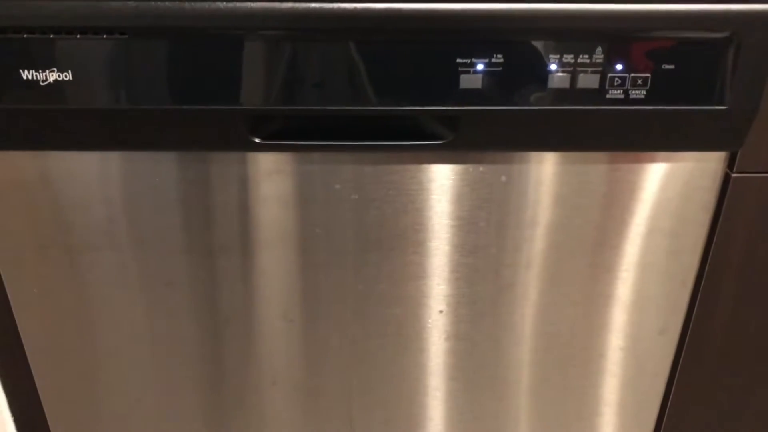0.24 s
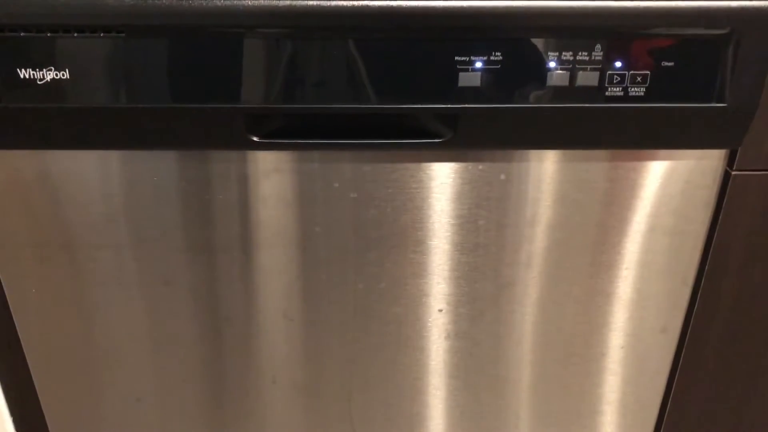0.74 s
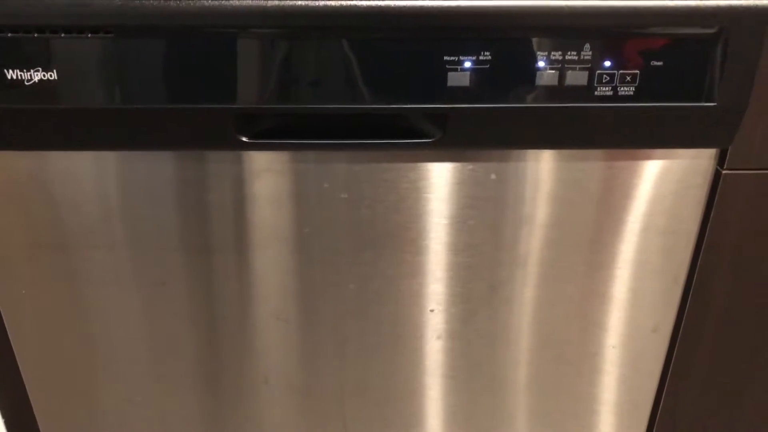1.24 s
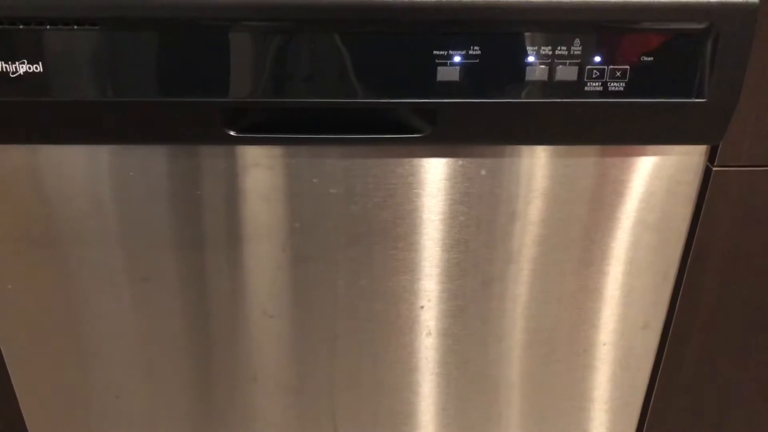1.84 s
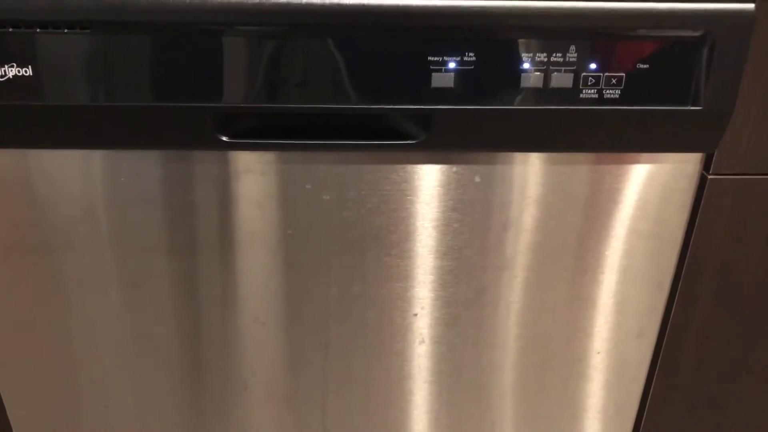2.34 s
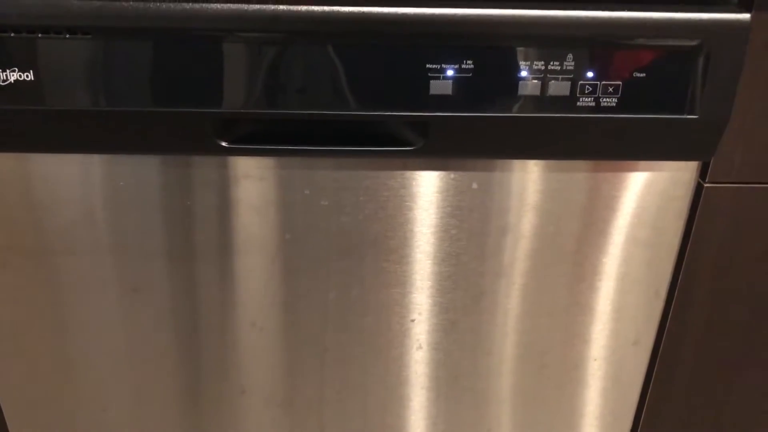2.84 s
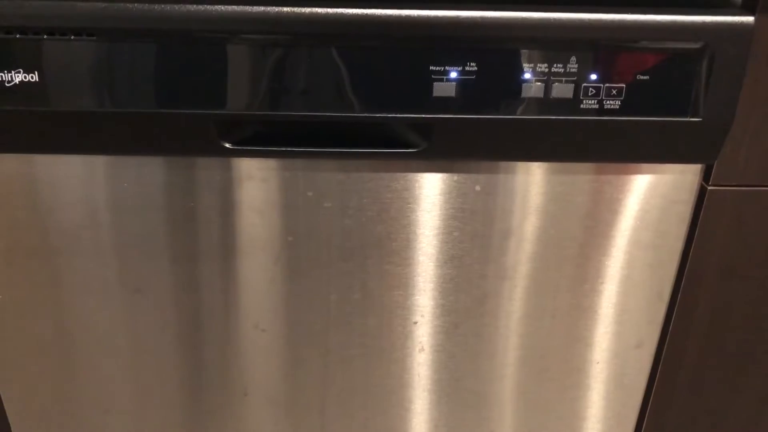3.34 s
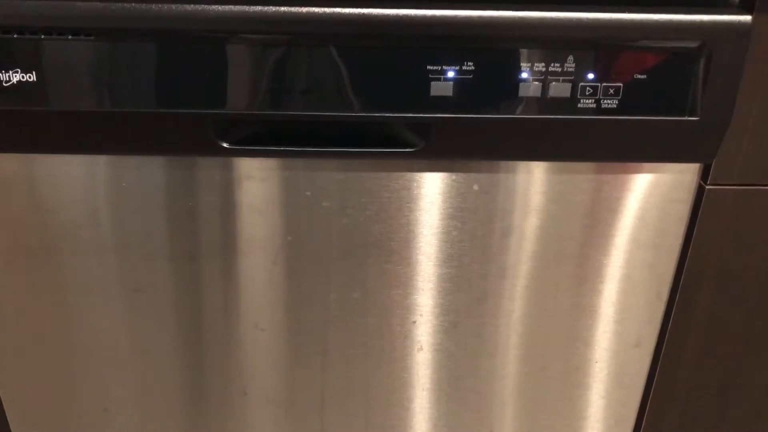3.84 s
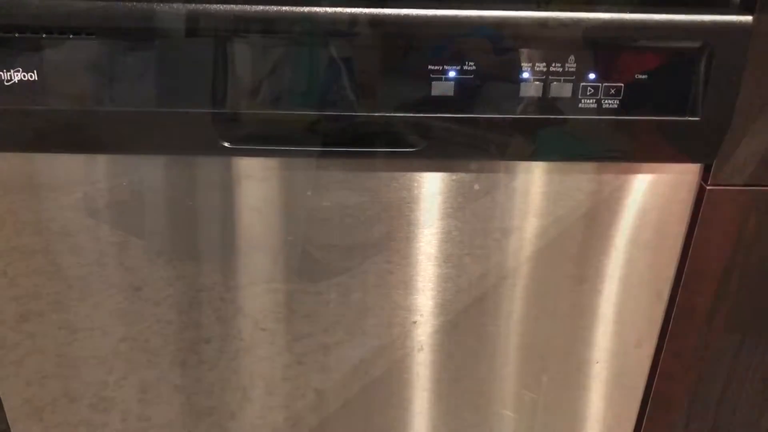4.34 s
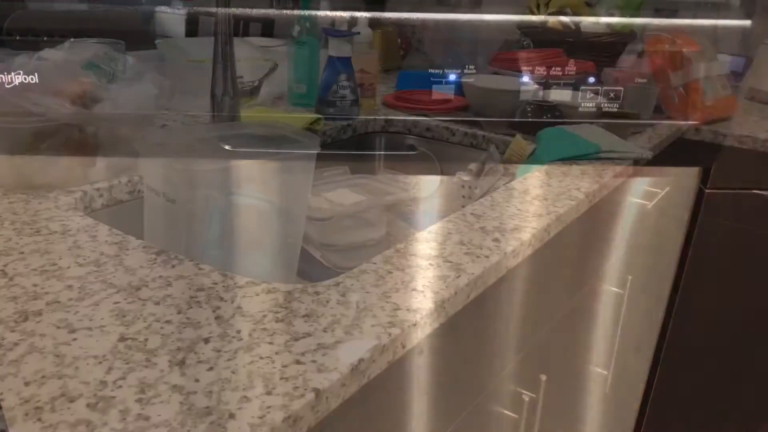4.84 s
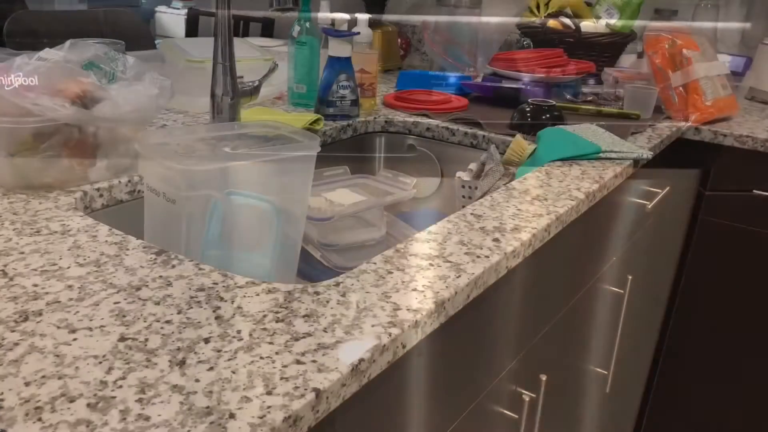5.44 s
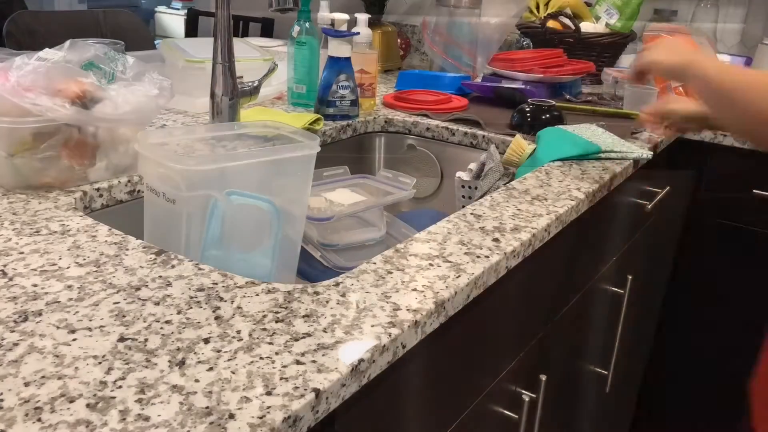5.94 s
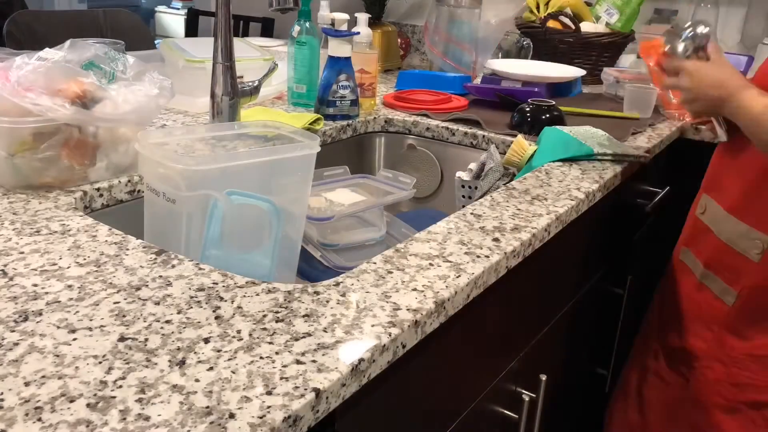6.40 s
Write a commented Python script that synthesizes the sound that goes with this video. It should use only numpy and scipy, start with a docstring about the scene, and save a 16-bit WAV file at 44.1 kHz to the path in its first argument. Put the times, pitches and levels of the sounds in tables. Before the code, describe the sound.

A dishwasher heard up close through its closed door in a home kitchen. A steady low electric hum sits under muffled water drumming on the metal tub, soft splashing and faint hiss. Irregular thuds, light clicks and gurgles pass throughout; dishes clink near the start and again before three seconds. From just past four seconds everything fades evenly to silence.

```python
"""A dishwasher in mid-wash, heard from just in front of its steel door in a kitchen.
From the start: the pump motor hums at twice the mains rate, spray drums on the tub, water splashes and churns.
Slugs, clicks and gurgles follow throughout; dishes clink at 0.2 s and about 2.6 s.
The panel drumming eases once a turn of the spray arm, around 1.7, 3.6 and 5.5 s.
From 4.2 s everything fades, to silence at 6.2 s. Water is filtered random impacts and bubbles; the hum is sines."""
import sys
import numpy as np
from scipy import signal
from scipy.fft import rfft, irfft
from scipy.io import wavfile
from scipy.ndimage import uniform_filter1d

SR = 44100
rng = np.random.default_rng(int(sys.argv[2]) if len(sys.argv) > 2 else 0)


def master(y):
    """Save y as 16-bit WAV."""
    cut = np.clip(np.atleast_2d(y).T, -1, 1)
    pcm = np.round(cut * 32767)  # scale
    wavfile.write(sys.argv[1], SR, pcm.astype(np.int16))


N = 294110
TIME_S = np.arange(N) / SR

# motor lines: (multiple of the hum rate [1], rms level [dB])
HUM_LINES = [(1, -40.5), (2, -69.5), (3, -65), (5, -68), (8, -79.5), (9, -84.5), (11, -81), (12, -86),
             (13, -79), (18, -83.5)]
# door and big tub panels: (frequency [Hz], width [Hz], gain [dB])
PANEL_MODES = [(145, 18, -3), (169, 28, -2), (209.2, 15, 5.5), (229.6, 78, -0.5), (271.5, 8.9, -5.5),
               (286.3, 4.2, -3.5), (321.4, 40, -10.5)]
# stiffer walls and racks: (frequency [Hz], width [Hz], gain [dB])
WALL_MODES = [(400, 24, -7), (435.4, 24, 2), (485, 22, 1.5), (515.7, 24, 3), (571.5, 22, -4.5),
              (620, 25, -9), (702, 31, -11), (764, 53, -11)]
# water churning in the sump: (frequency [Hz], relative density [dB per Hz])
SUMP_SPECTRUM = [(25, -27), (40, -12.5), (50, -5), (58, 7), (82, 9), (105, -2.5), (135, -2), (170, 2.5),
                 (300, -36.5)]
# splash heard through the door: (frequency [Hz], relative density [dB per Hz])
SPLASH_SPECTRUM = [(500, -6), (880, -4), (1050, -1.3), (1450, -2.2), (1660, -5.7), (2150, -6), (2600, -9),
                   (4000, -9), (4700, -12), (6200, -13.3), (8200, -18.3), (10000, -18), (12300, -21.5),
                   (15000, -20)]
# thin, steady bands of hiss: (frequency [Hz], width [Hz], gain [dB])
SIZZLE_BANDS = [(5390, 220, -8.5), (6860, 280, -9.5), (8760, 160, -14), (9700, 180, -4), (10180, 140, 0.5),
                (11060, 400, -7), (13800, 1200, -12)]
# slugs of water hitting the panels: (time [s], thud peak [dB], pitch [Hz], splat re thud [dB])
SLUG_HITS = [(0.072, -42, 175, -11), (.098, -39, 227, -13), (.187, -39.5, 400, -16),
             (.565, -36.5, 224, -11), (0.763, -43, 407, -15), (.800, -33.5, 200, -16),
             (0.82, -36, 215, -23.5), (.866, -34.5, 213, -18.5), (.998, -33, 276, -18),
             (.999, -39, 475, -23), (1.048, -39, 286, -14.5), (1.135, -41, 202, -15),
             (1.152, -38, 213, -18), (1.171, -38, 180, -18), (1.2, -39, 205, -22.5), (1.25, -36, 218, -22),
             (1.485, -40.5, 223, -18), (1.886, -39.5, 212, -18.5), (1.925, -39, 240, -24),
             (1.958, -45, 440, -21), (2.094, -40.5, 507, -27), (2.135, -44.5, 494, -20),
             (2.192, -37, 403, -22.5), (2.275, -40, 245, -12.5), (2.496, -38.5, 164, -19.5),
             (2.55, -45, 202, -13), (2.598, -41.5, 418, -7), (2.777, -39, 240, -15), (2.794, -39, 217, -27),
             (2.836, -41, 240, -7), (2.916, -42, 225, -23), (2.958, -39, 209, -11),
             (3.334, -45, 232, -23.5), (3.459, -45, 217, -25), (3.759, -38.5, 230, -12),
             (3.761, -46.5, 553, -6), (3.925, -53, 233, -20), (3.99, -44, 350, -18),
             (4.118, -41, 268, -17.5), (4.173, -36.5, 310, -27), (4.243, -51, 235, -18),
             (4.4, -34.5, 215, -16), (4.455, -45, 220, -18), (4.565, -39, 205, -24),
             (4.593, -38.5, 210, -42), (4.747, -36, 204, -10), (4.779, -38.5, 210, -17),
             (4.803, -36, 209, -12), (4.846, -37, 205, -24), (4.896, -34, 200, -21),
             (4.922, -43.5, 225, -30), (5.023, -36.5, 238, -9.5), (5.125, -47, 214, -15)]
# light clicks and taps: (time [s], peak [dB], frequency [Hz], width [Hz])
CLICK_EVENTS = [(.177, -52.5, 9700, 1000), (.177, -53, 4400, 2000), (.2295, -54, 13000, 6000),
                (.358, -53.5, 7000, 2500), (.7542, -49, 3170, 798), (.7931, -41.5, 1100, 600),
                (.7931, -51.5, 4300, 3200), (.9697, -52.5, 14200, 2910), (1.1787, -45, 4060, 2390),
                (1.1805, -50.5, 3230, 350), (1.8108, -53, 3770, 403), (2.0053, -54.5, 4350, 500),
                (2.0916, -51, 1690, 1990), (2.095, -53, 13800, 5000), (2.2189, -48.5, 9400, 2600),
                (2.4214, -50.5, 5500, 746), (2.4583, -52, 6900, 1800), (2.5571, -51, 9000, 1200),
                (2.5894, -49.5, 9800, 7040), (2.598, -57.5, 10000, 7000), (2.6115, -50, 3800, 2000),
                (2.6944, -55.5, 7000, 2990), (3.2775, -56, 7300, 1200), (3.333, -49, 1400, 300),
                (3.3425, -50, 2480, 900), (3.379, -55, 2750, 350), (3.4635, -59, 9200, 800),
                (4.3266, -47, 1120, 900), (5.022, -52, 1750, 700), (5.323, -52, 1550, 600),
                (5.39, -54, 6200, 1300), (5.4904, -48, 4450, 1200), (6.0117, -48, 7200, 1500),
                (6.083, -53, 9500, 2000), (6.109, -47, 7000, 2420)]
# short gurgles and swishes: (time [s], peak [dB], frequency [Hz], width [Hz])
GURGLE_EVENTS = [(.648, -48, 780, 100), (.672, -45.5, 780, 80.4), (1.012, -50.5, 1060, 250),
                 (1.06, -52, 1200, 400), (1.562, -47, 1240, 892), (1.6, -50, 1800, 900),
                 (2.03, -51.5, 3200, 900), (4.228, -48.5, 1890, 1500), (4.79, -49, 1208, 400),
                 (5.055, -52, 1314, 500)]
# dishes knocking together: (time [s], peak [dB], contact centre [Hz], chatter t60 [s])
CLINK_EVENTS = [(.1897, -41, 6200, .06), (2.5574, -48.5, 5400, .04), (2.6115, -39.5, 5600, .028),
                (2.637, -48.5, 6900, 0.018)]
# ringing modes of a dish: (frequency [Hz], width [Hz], gain [dB])
DISH_MODES = [(4280, 160, -10.5), (5000, 230, 4), (5340, 200, -0.5), (6170, 170, 8), (6460, 180, -7),
              (6850, 180, -2), (8200, 210, -14.5)]
# amount of water landing on the tub: (time [s], level [dB])
FLOW_CURVE = [(0.0, -5), (0.15, 1.5), (0.5, -1.1), (0.85, -0.5), (1.1, 2.5), (1.35, -0.5), (1.55, 2),
              (1.78, -0.4), (2.15, 3), (2.38, -2.5), (2.6, -0.2), (2.9, 0.5), (3.15, -1.2), (3.55, -1),
              (3.72, -2), (3.95, -1.8), (4.2, 1.5), (4.45, 1), (4.7, -1), (5.15, 2.5), (5.62, -3.5),
              (5.9, 0.7)]
# swell of the fine splash and droplets: (time [s], level [dB])
SPLASH_SWELL_CURVE = [(0.0, 0.6), (1.15, 0.6), (1.35, -0.6), (1.6, 0.7), (2.2, 0), (2.7, 1), (2.9, -2),
                      (3.25, 0.3), (3.7, -1.2), (4.27, 2), (4.6, -0.5), (5.05, 0.3), (5.5, 0), (5.9, -1)]

HUM_HZ, HUM_START_DB, HUM_SAG_DB_PER_S = 120.02, -0.02, 0.06
# spray arm: one turn, a moment when its jets point away from the panels, 1/e half-width of that lull
ARM_TURN_S, ARM_AWAY_S, LULL_S = 1.9, 1.66, 0.3
# drumming level, and its drop in the lull (negative: a rise)
PANEL_DB, PANEL_LULL_DROP_DB = -50, 4
WALL_DB, WALL_LULL_DROP_DB = -55.4, -1
SPLASH_DB, DROPLET_DB, SUMP_DB, SIZZLE_DB = -59.5, -72, -58, -74.5
SLOSH_DB, SLOSH_LOW_HZ, SLOSH_HIGH_HZ = -69, 836, 2330  # larger bubbles: level, range of starting pitch
SLOSH_FOLLOWS, SUMP_FOLLOWS = 0.4, 0.15  # share of the flow's dB swing
CLICK_T60_S, GURGLE_T60_S = 0.043, 0.17
FADE_START_S, FADE_END_S, CUTOFF_HZ = 4.21, 6.19, 15720


def from_db(db):
    """Decibels to gain."""
    return 10 ** (np.asarray(db) / 20)


def rms_one(x):
    """Scale to unit rms."""
    return x / np.sqrt(np.mean(x ** 2) + 1e-20)


def drift(rate_hz):
    """Slow random curve of unit rms: noise through a double pole, made at SR / 40."""
    pole = np.exp(-80 * np.pi * rate_hz / SR)
    noise = rng.standard_normal(N // 40 + 2002)
    slow = signal.lfilter([1], [1, -2 * pole, pole * pole], noise)[2000:]  # settled part only
    return np.interp(np.arange(N) / 40, np.arange(len(slow)), rms_one(slow))


def in_time(rows):
    """Curve of (time [s], value) at every sample."""
    return np.interp(TIME_S, *np.transpose(rows))


def colour(x, spectrum):
    """Shape a signal by (frequency [Hz], level [dB]) with the bass rolled off; unit rms."""
    hz, db = np.transpose(spectrum)
    bins_hz = np.maximum(np.fft.rfftfreq(N, 1 / SR), 1)
    closed_bass = np.minimum(bins_hz / hz[0], 1) ** 2
    gain = from_db(np.interp(np.log(bins_hz), np.log(hz), db))
    return rms_one(irfft(rfft(x) * gain * closed_bass, N))


def resonate(x, hz, width_hz):
    """One two-pole resonance with peak gain 1."""
    r = np.exp(-np.pi * width_hz / SR)
    zeros = np.array([1, 0, -1]) * (1 - r * r) / 2
    poles = [1, -2 * r * np.cos(2 * np.pi * hz / SR), r * r]
    return signal.lfilter(zeros, poles, x + 1e-18)


def body(x, modes):
    """Drive a set of modes in parallel."""
    return sum(from_db(db) * resonate(x, hz, width_hz) for hz, width_hz, db in modes)


def band(x, low_hz, high_hz):
    """Causal band-pass."""
    return signal.sosfilt(signal.butter(2, [low_hz, high_hz], "band", fs=SR, output="sos"), x)


def even(x, window_s):
    """Hold the running rms at 1, so that the level curves set the swells."""
    power = uniform_filter1d(x ** 2, max(int(window_s * SR), 1))
    return x / np.sqrt(np.maximum(power, 1e-6 * np.mean(x ** 2)))


def place(out, event, start):
    """Add an event in place from sample start."""
    out[start:start + len(event)] += event


def drops(per_s, spread_db, clump_db, clump_rate_hz):
    """Random impacts of uneven size and sign, their strength drifting by clump_db."""
    sizes = from_db(spread_db * np.minimum(rng.exponential(1, N), 4)) * rng.choice([-1, 1], N)
    hits = rng.random(N) < per_s / SR
    return sizes * hits * from_db(clump_db * drift(clump_rate_hz))


def diffuse(impacts, t60_s, wet_db):
    """Every impact falls elsewhere in the tub, so each gets a fresh noise tail of reflections."""
    keep = from_db(-60 / (t60_s * SR)) ** 2
    energy = signal.lfilter([1 - keep], [1, -keep], impacts ** 2 + 1e-18)
    return impacts + from_db(wet_db) * np.sqrt(energy) * rng.standard_normal(N)


def arm_lull():
    """Rises from near 0 to 1 and back once a turn, as the jets swing away from the panels."""
    from_away_s = (TIME_S - ARM_AWAY_S + ARM_TURN_S / 2) % ARM_TURN_S - ARM_TURN_S / 2
    return np.exp(-(from_away_s / LULL_S) ** 2)


def sizzle():
    """Steady hiss: independent noise in each thin band."""
    hiss = sum(body(rng.standard_normal(N), [mode]) for mode in SIZZLE_BANDS)
    return from_db(SIZZLE_DB) * rms_one(hiss)


def bursts(rows, t60_s, grain_db, tail_db):
    """Each is a brief, grainy rattle dying away in one broad resonance, with a faint room tail."""
    out, age_s = np.zeros(N), TIME_S[:SR // 4]
    for time_s, peak_db, hz, width_hz in rows:
        decay = np.exp(-np.log(1000) * age_s / t60_s) + from_db(tail_db) * np.exp(-age_s / 0.06)
        roughness = rms_one(uniform_filter1d(rng.standard_normal(len(age_s)), size=90))
        burst = rng.choice([-1, 1], len(age_s)) * from_db(grain_db * roughness) * decay
        stage_width_hz = width_hz * np.sqrt(2)  # two stages in series
        tick = resonate(resonate(burst, hz, stage_width_hz), hz, stage_width_hz)
        place(out, from_db(peak_db) * tick / np.abs(tick).max(), round(time_s * SR))
    return out


def clicks():
    """Light clicks and taps: short, fairly smooth bursts."""
    return bursts(CLICK_EVENTS, CLICK_T60_S, grain_db=1.0, tail_db=-15)


def gurgles():
    """Gurgles and swishes: longer, grainier bursts."""
    return bursts(GURGLE_EVENTS, GURGLE_T60_S, grain_db=4.5, tail_db=-13)


def clinks(contact_width_hz, chatter_db, tail_db, tail_t60_s, crack_db):
    """Hard contact, chatter and room tail ring the dish modes, each clink in its own register."""
    out, age_s = np.zeros(N), TIME_S[:SR // 4]
    tail = from_db(tail_db - 60 * age_s / tail_t60_s)
    for time_s, peak_db, hz, chatter_t60_s in CLINK_EVENTS:
        chatter = from_db(chatter_db - 60 * age_s / chatter_t60_s)
        rattle = (chatter + tail) * rng.choice([-1, 1], len(age_s))
        contact = signal.unit_impulse(len(age_s)) + rattle
        ring = body(resonate(contact, hz, contact_width_hz), DISH_MODES)
        clink = ring + from_db(crack_db) * band(contact, 4300, 7100)
        place(out, from_db(peak_db) * clink / np.abs(clink).max(), round(time_s * SR))
    return out


def droplets(level_db, per_s, cycles):
    """Single drops and bubbles plink, each at its own slightly rising pitch; few are loud."""
    out, age_s = np.zeros(N), TIME_S[:SR // 20]
    for when, pitch, size in rng.random((int(per_s * N / SR), 3)):
        hz = 750 * 9 ** pitch
        life_s = cycles / (np.pi * hz)
        plink = np.sin(2 * np.pi * hz * age_s * (1 + 2 * age_s)) * np.exp(-age_s / life_s)
        loudness = size ** 3 * hz ** -.15  # small bubbles are a little fainter
        place(out, loudness * plink, int(when * (N - len(age_s))))
    return from_db(level_db) * rms_one(out)


def sloshing(level_db, per_s, cycles, clump_db):
    """Larger bubbles gulp in uneven clusters, each ringing briefly at its own rising pitch."""
    out, age_s = np.zeros(N), TIME_S[:SR // 12]
    for when, pitch, size in rng.random((int(per_s * N / SR), 3)):
        hz = SLOSH_LOW_HZ * (SLOSH_HIGH_HZ / SLOSH_LOW_HZ) ** pitch
        gulp = np.sin(2 * np.pi * hz * age_s * (1 + age_s)) * np.exp(-np.pi * hz * age_s / cycles)
        place(out, size ** 2 * hz ** -.5 * gulp, int(when * (N - len(age_s))))
    return from_db(level_db) * rms_one(out * from_db(clump_db * drift(9.4)))


def splashing(splash_db, wall_db, follow, throb):
    """Drops clump separately in each band over a smooth rush; the treble throbs with the pump."""
    edges_hz = np.geomspace(450, 17000, num=6)
    grains = np.zeros(N)
    for low_hz, high_hz in zip(edges_hz, edges_hz[1:]):
        impacts = drops(per_s=4500, spread_db=4.0, clump_db=2.5, clump_rate_hz=19)
        grains += band(rms_one(diffuse(impacts, t60_s=.08, wet_db=-7.0)), low_hz, high_hz)
    rush = from_db(-2.5) * rng.standard_normal(N)
    water = even(colour(grains + rush, SPLASH_SPECTRUM), window_s=0.32)
    coarse = signal.sosfiltfilt(signal.butter(2, 2200, fs=SR, output="sos"), water)
    fine = water - coarse
    surge_db = follow * (wall_db - np.mean(wall_db))  # coarse part surges with the patter on the walls
    phase = 2 * np.pi * HUM_HZ * TIME_S
    pulsing = 1 + throb * (np.sin(phase) + np.cos(2 * phase))
    return from_db(splash_db) * (from_db(surge_db) * coarse + pulsing * fine)


def sump(flow_db):
    """Low churn: random impacts shaped by the sump spectrum, partly following the flow."""
    impacts = drops(per_s=360, spread_db=2.0, clump_db=-0.5, clump_rate_hz=8.6)
    churn = even(colour(impacts, SUMP_SPECTRUM), window_s=0.43)
    return from_db(SUMP_DB + SUMP_FOLLOWS * flow_db) * churn


def slugs(focus_width_hz):
    """A slug of water is a soft blow ringing the tub modes near its own pitch, with a short splat."""
    out, age_s = np.zeros(N), TIME_S[:SR // 3]
    for time_s, peak_db, hz, splat_db in SLUG_HITS:
        push = resonate(signal.unit_impulse(len(age_s)), hz, focus_width_hz)
        thud = body(push, PANEL_MODES + WALL_MODES)
        splat = band(rng.standard_normal(len(age_s)) * np.exp(-age_s / 0.023), 450, 1400)
        blow = thud / np.abs(thud).max() + from_db(splat_db) * splat / np.abs(splat).max()
        place(out, from_db(peak_db) * blow, round(time_s * SR))
    return out


def drumming(panel_db, wall_db):
    """Heavy drops boom on the broad panels, finer ones patter on the stiff walls."""
    heavy = drops(per_s=650, spread_db=1.5, clump_db=0.0, clump_rate_hz=42)
    finer = drops(per_s=1400, spread_db=2.5, clump_db=0.5, clump_rate_hz=32)
    boom = even(band(body(heavy, PANEL_MODES), 100, 380), window_s=0.08)
    patter = even(band(body(finer, WALL_MODES), 320, 950), window_s=0.14)
    return from_db(panel_db) * boom + from_db(wall_db) * patter


def motor(waver_db, overtone_waver_db, phase_wander_rad):
    """Magnetic hum at twice the mains rate, slowly sagging; overtones waver in level and phase."""
    phase = 2 * np.pi * HUM_HZ * TIME_S
    out = np.zeros(N)
    for index, (multiple, db) in enumerate(HUM_LINES):
        level_db = db + (overtone_waver_db if index else waver_db) * drift(1.3)
        wander = phase_wander_rad * np.log(multiple) * drift(1.8)  # none on the fundamental
        start_phase = rng.uniform(0, 2 * np.pi)
        out += np.sqrt(2) * from_db(level_db) * np.sin(multiple * phase + wander + start_phase)
    return out * from_db(HUM_START_DB - HUM_SAG_DB_PER_S * TIME_S)


def scene():
    """Sum water, dishes, clicks and motor at one microphone."""
    flow_db, swell_db, lull = in_time(FLOW_CURVE), in_time(SPLASH_SWELL_CURVE), arm_lull()
    panel_db = PANEL_DB + flow_db - PANEL_LULL_DROP_DB * lull
    wall_db = WALL_DB + flow_db - WALL_LULL_DROP_DB * lull
    small = clicks() + gurgles()
    dishes = clinks(contact_width_hz=3500, chatter_db=-11, tail_db=-29, tail_t60_s=0.26, crack_db=-9)
    plinks = droplets(DROPLET_DB + swell_db, per_s=110, cycles=30)
    slosh = sloshing(SLOSH_DB + SLOSH_FOLLOWS * flow_db, per_s=240, cycles=18, clump_db=1.5)
    spray = splashing(SPLASH_DB + swell_db, wall_db, follow=0.21, throb=0.061)
    tub = slugs(focus_width_hz=64) + drumming(panel_db, wall_db)
    hum = motor(waver_db=0.22, overtone_waver_db=2.5, phase_wander_rad=0.15)
    return (sizzle() + small + dishes + plinks + slosh + spray + sump(flow_db) + tub + hum)[None]


def record(dry):
    """Straight fade to silence, then a steep low-pass."""
    fade = np.clip((FADE_END_S - TIME_S) / (FADE_END_S - FADE_START_S), 0, 1)
    low_pass = signal.ellip(12, .1, 80, CUTOFF_HZ, fs=SR, output="sos")
    return signal.sosfilt(low_pass, dry * fade)


dry = scene()
out = record(dry)
master(out)
```